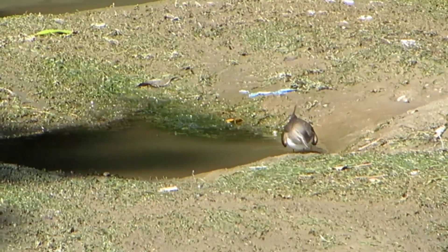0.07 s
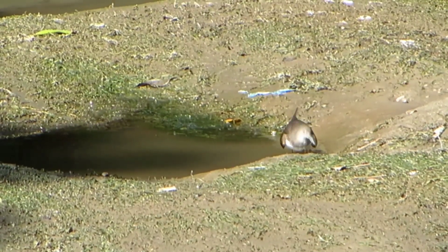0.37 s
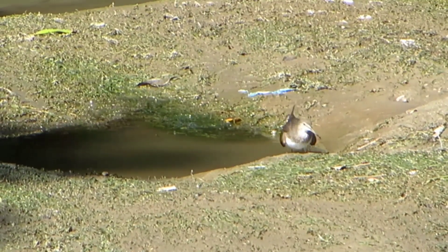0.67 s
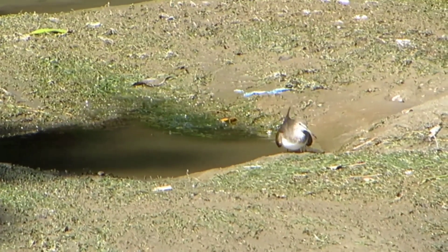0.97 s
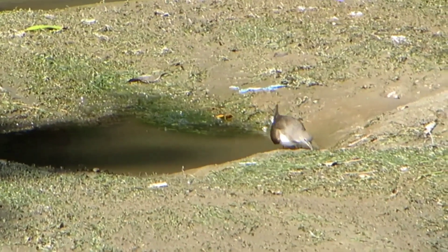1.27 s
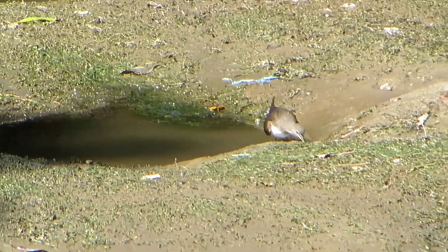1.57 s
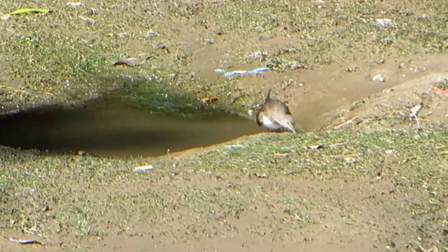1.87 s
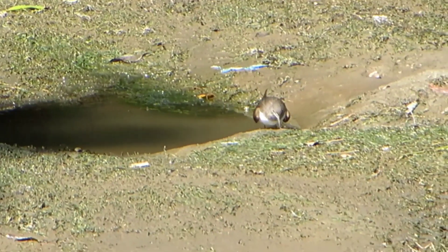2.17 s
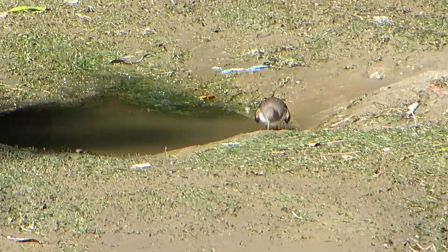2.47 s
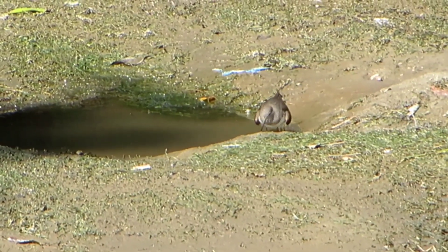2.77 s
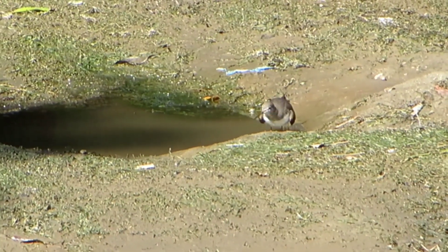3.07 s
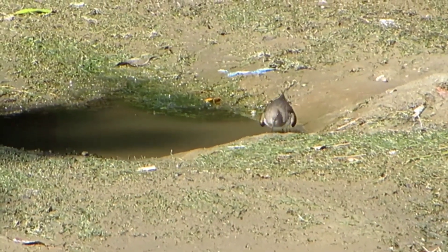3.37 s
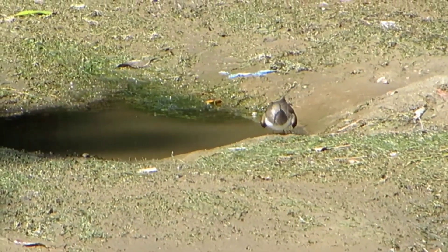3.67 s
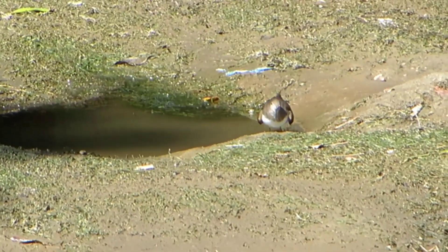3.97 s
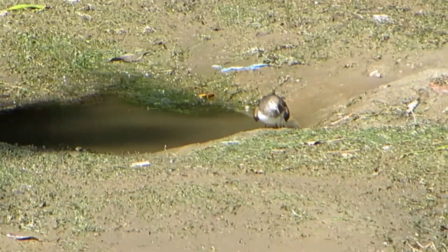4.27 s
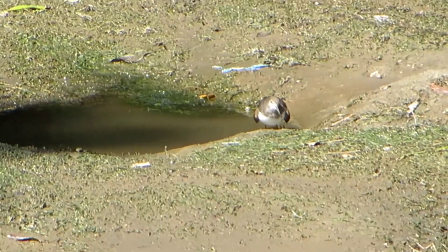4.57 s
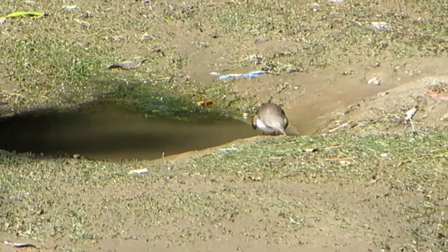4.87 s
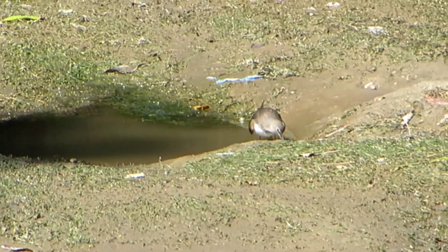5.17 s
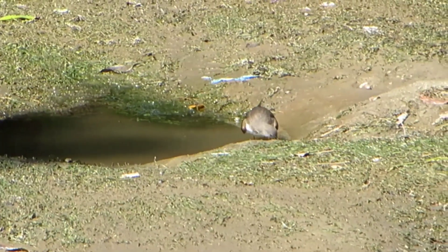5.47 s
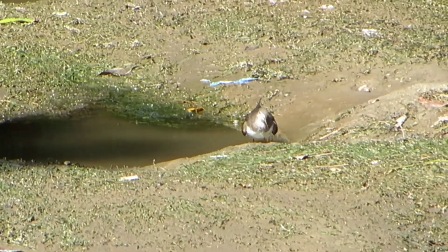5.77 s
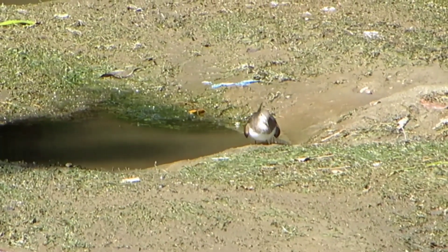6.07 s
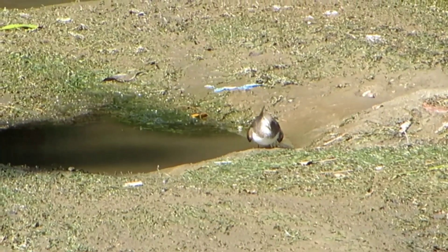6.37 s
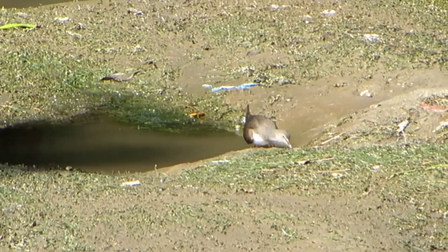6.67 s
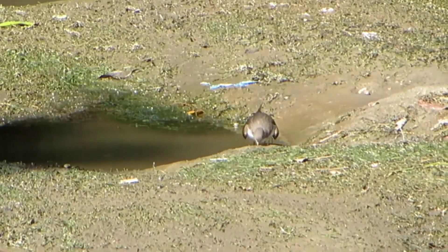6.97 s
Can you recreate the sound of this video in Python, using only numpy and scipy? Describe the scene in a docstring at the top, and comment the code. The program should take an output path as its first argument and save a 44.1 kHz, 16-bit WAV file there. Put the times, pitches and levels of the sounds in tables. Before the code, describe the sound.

Wind blows directly on a microphone outdoors, over a faint steady hiss of air and a very thin, high electronic whine. At the start there are a few light flutters, while a soft background swell fades away. From about 0.8 seconds the gusts strengthen into short, hollow thuds over a rapid flutter of smaller ones, jumping irregularly between left and right. The hardest thud lands at about 1.6 seconds, followed at once by a single distant, raspy bird chirp, barely above the hiss. Strong buffeting continues until about 2.5 seconds, then gives way to lighter, scattered flaps mostly on the right, with a sharper one near 3.4 seconds. From about 4 seconds the wind eases into a low rumble with a few soft, dull thumps, the clearest near 6.1 and 6.9 seconds. The rumble drops away at about 7 seconds.

```python
"""Wind on the two microphone ports of a camera held over a muddy puddle in the open.
From the start, the air hisses behind a fading swell and the camera's electronics whine faintly.
Gusts drive eddies into the ports: short hollow thuds over a flutter of smaller ones.
Just after the hardest thud, at about 1.7 s, comes one far chirp.
From about 4 s the wind eases to a low rumble with a few soft thumps."""
import sys
import numpy as np
from scipy import signal
from scipy.fft import rfft, irfft, next_fast_len
from scipy.io import wavfile
from scipy.ndimage import map_coordinates

SR = 44100
rng = np.random.default_rng(int(sys.argv[2]) if len(sys.argv) > 2 else 0)


def bounce(signal):
    """Save signal as a 16-bit WAV file at the path given by the first command-line argument."""
    frames = np.transpose(np.atleast_2d(signal))
    limited = np.clip(frames, -1, 1)
    pcm = np.round(limited * 32767).astype(np.int16)
    wavfile.write(sys.argv[1], SR, pcm)


N = 314433
TIME = np.arange(N) / SR

# level rides of the far rush and the finer hiss: time_s, level_db
RUSH_RIDE = [(0, -48.5), (.5, -55), (1.2, -52), (1.9, -51.5), (2.6, -52.5), (4.1, -50.5), (4.6, -49.5),
             (6.3, -50), (7.13, -53)]
HISS_RIDE = [(0, -48), (3.0, -47.5), (4.3, -46.5), (5.4, -47), (7.13, -48)]
# tone of the rush, the hiss and the swell: frequency_hz, relative_db
RUSH_TONE = [(20, -19), (60, -5.5), (150, -0.5), (300, 0.5), (400, -3.5), (500, -6.5), (700, 2),
             (1000, 0.5), (1500, -7.5), (3000, -61), (12000, -80)]
HISS_TONE = [(30, -48), (300, -15.5), (700, -1.5), (1200, 0), (1600, 0), (2600, -4), (3300, -7),
             (5000, -10.5), (7000, -13.5), (10000, -19), (15000, -25)]
SWELL_TONE = [(300, -38), (900, -6), (1400, -1.5), (1900, -4.5), (2800, -14), (8000, -50)]
# stereo image of the air: frequency_hz, left_right_correlation
AIR_IMAGE = [(60, 0.83), (300, 1), (800, 0.28), (1500, 0.19), (3000, -0.36), (5000, -0.54), (10000, -0.49),
             (15000, -0.3)]
# electronic whine, the upper two tones beating: pitch_hz, left_db, right_db
WHINE_TONES = [(7866.8, -77, -66.3), (15733.6, -83, -61), (15748.0, -90, -68)]
# gusts that drive the flutter: start_s, length_s, level_db, left_minus_right_db
GUST_CUES = [(0.0, 0.026, -43, 10.5), (0.12, .015, -40, -8), (0.166, 0.037, -37, -3),
             (0.253, 0.043, -48.5, -8), (0.38, 0.063, -53.5, -12), (0.752, 0.075, -38.5, -1),
             (0.894, 0.02, -32, 8.5), (0.952, 0.013, -31.5, 12.5), (1.0, .05, -31.5, 1),
             (1.079, 0.018, -22.5, 11), (1.136, 0.073, -40.5, 10), (1.302, 0.013, -26, -4),
             (1.381, 0.096, -36, 5), (1.502, 0.043, -36, 5), (1.669, 0.064, -27, 1), (1.783, 0.16, -36, -9),
             (1.895, 0.142, -27, 9.5), (2.061, 0.054, -24.5, 2), (2.313, 0.18, -31, 3.5),
             (2.508, 0.11, -49, -12), (2.79, .135, -43, -10.5), (3.257, 0.041, -47, -16.5),
             (3.395, 0.01, -35.5, -21), (3.435, .025, -44, -9), (3.493, 0.076, -46.5, -14),
             (3.677, .02, -42.5, -16), (3.745, .05, -39, -12), (3.813, 0.066, -46, -21.5)]
# base pitch of the small eddies, before gust strength shifts it: time_s, pitch_hz
FLUTTER_PITCH = [(.5, 173), (.95, 280), (2.05, 290), (2.5, 251), (3.9, 310)]
# how the ports and their housing colour the wind: frequency_hz, gain_db
HOUSING_EQ = [(20, -15), (50, -14.5), (100, -6), (200, -1.5), (270, -0.5), (340, 0), (455, -1.5),
              (505, -2.5), (570, 1), (850, 2), (1500, 6)]
# big eddies, before the level cap and the housing: time_s, strength_db, port (0 left, 1 right)
BUFFET_CUES = [(0.129, -27, 1), (0.183, -27, 0), (0.202, -13, 1), (0.789, -21, 1), (0.908, -12.5, 0),
               (0.924, -8, 0), (0.97, -7.5, 0), (1.016, -12, 1), (1.06, -8, 1), (1.083, -11, 0),
               (1.094, -7.5, 0), (1.102, -2.5, 0), (1.145, -17.5, 1), (1.307, -16, 1), (1.316, -7.5, 1),
               (1.321, -5, 0), (1.376, -13, 1), (1.394, -10, 1), (1.411, -12.5, 0), (1.505, -17.5, 0),
               (1.565, 3.5, 1), (1.676, -4.5, 0), (1.695, -5.5, 0), (1.725, -6, 0), (1.826, -16, 1),
               (1.862, -14, 1), (1.908, -14, 0), (1.934, -8.5, 0), (1.958, -8.5, 0), (1.995, -13.5, 0),
               (2.042, -11, 0), (2.063, -8.5, 0), (2.08, -5.5, 1), (2.095, -6.5, 1), (2.102, -7.5, 1),
               (2.132, -16, 1), (2.195, -23, 1), (2.279, -21, 1), (2.315, -13.5, 0), (2.349, -13.5, 1),
               (2.394, -10.5, 0), (2.477, -20, 1), (2.804, -21.5, 1), (2.885, -19.5, 1), (2.927, -14.5, 1),
               (2.948, -19, 1), (2.992, -24, 1), (3.257, -23, 1), (3.396, -6, 1), (3.434, -11.5, 1),
               (3.447, -16.5, 1), (3.513, -15.5, 1), (3.561, -22, 1), (3.609, -23, 1), (3.723, -19, 1),
               (3.756, -16, 1), (3.79, -16.5, 1)]
# level rides of the late breeze: time_s, rumble_db, deep_db
BREEZE_RIDE = [(4.1, -62, -81), (4.3, -52, -69), (4.9, -50.5, -59), (5.3, -47.5, -45.5), (5.6, -51, -50.5),
               (5.9, -49.5, -45.5), (6.08, -46, -46), (6.19, -52, -59), (6.66, -47, -44),
               (6.92, -48.5, -49), (7.02, -69, -66)]
# tone of the breeze's rumble and of its deep layer: frequency_hz, relative_db
RUMBLE_TONE = [(10, -39), (60, -25), (150, 2.5), (240, -1.5), (330, 2), (410, -13), (800, -24), (3000, -90)]
DEEP_TONE = [(15, -11), (30, -4), (60, 9), (100, 4.5), (160, 7), (215, -16), (300, -21), (2000, -90)]
# soft low thumps in the breeze: time_s, peak_db, pitch_hz
THUMP_CUES = [(4.29, -30, 215), (5.023, -26.5, 186), (5.449, -24.5, 150), (5.825, -28.5, 110),
              (6.084, -18.5, 146), (6.61, -21.5, 150), (6.659, -24, 135), (6.675, -24, 210),
              (6.929, -18, 130)]


def from_db(db):
    """Decibels to gain."""
    return 10 ** (np.asarray(db) / 20)


def rms_one(x):
    """Scale to an rms of 1."""
    return x / np.sqrt(np.mean(x ** 2) + 1e-20)


def in_time(rows):
    """Each column of a curve at every sample."""
    time_s, *columns = np.transpose(rows)
    return [np.interp(TIME, time_s, column) for column in columns]


def at_hz(points, hz):
    """Read a curve on a log-frequency axis."""
    point_hz, value = np.transpose(points)
    return np.interp(np.log(hz + 1e-9), np.log(point_hz), value)


def drift(rate_hz):
    """A smooth random wobble, about 1 in size, that changes about rate_hz times a second."""
    knots = rng.standard_normal(N // 40)
    return map_coordinates(knots, [TIME * rate_hz], order=2, mode="wrap")


def filtered(x, gain_at):
    """Weight each frequency by gain_at(hz)."""
    size = next_fast_len(N + SR // 10)
    hz = np.arange(size // 2 + 1) * SR / size
    return irfft(rfft(x, size) * gain_at(hz), size)[:, :N]


def noise_bed(tone, image=((1, 0),)):
    """Stereo noise of rms 1 with a given tone and image; by default the sides are unrelated."""
    size = next_fast_len(N)
    hz = np.arange(size // 2 + 1) * SR / size
    alike = np.clip(at_hz(image, hz), -1, 1)
    mid, side = rfft(rng.standard_normal((2, size)))
    pair = np.sqrt(1 + alike) * mid + np.sqrt(1 - alike) * side * [[1], [-1]]
    return rms_one(irfft(pair * from_db(at_hz(tone, hz)), size)[:, :N])


def open_air(swell_db=-46.5, fade_db_per_s=6):
    """The backdrop: a far rush and a finer hiss, both leaning right, and a swell that dies away early."""
    rush_db, = in_time(RUSH_RIDE)
    hiss_db, = in_time(HISS_RIDE)
    rush = from_db(rush_db + 0.76 * drift(11)) * noise_bed(RUSH_TONE, AIR_IMAGE)
    hiss = from_db(hiss_db + 0.28 * drift(11)) * noise_bed(HISS_TONE, AIR_IMAGE)
    fading_db = swell_db - fade_db_per_s * TIME
    swell = from_db(fading_db + 1.1 * drift(11)) * noise_bed(SWELL_TONE, AIR_IMAGE)
    return rush * from_db([[-.8], [.8]]) + hiss * from_db([[-.2], [.2]]) + swell


def whine():
    """Thin steady tones from the camera's circuits, a quarter cycle apart on the two sides."""
    phase = np.array([[np.pi / 2], [0]])
    return np.sqrt(2) * sum(from_db([[left_db], [right_db]]) * np.sin(2 * np.pi * hz * TIME + phase)
                            for hz, left_db, right_db in WHINE_TONES)


def gust_envelope(attack_db_per_s=899, release_db_per_s=750, lull_db=-67):
    """Each gust rises, holds and falls away; the strongest sets the level at each port, in dB."""
    start_s, length_s, level_db, balance_db = np.transpose(GUST_CUES)[:, :, None]
    attack_db = attack_db_per_s * np.maximum(start_s - TIME, 0)
    release_db = release_db_per_s * np.maximum(TIME - start_s - length_s, 0)
    each_db = level_db - attack_db - release_db
    port_db = [(each_db + side * balance_db).max(axis=0) for side in (.5, -.5)]
    return np.maximum(port_db, lull_db)


def eddies(at_s, peak_db, pitch_hz, port, steepness, skew, size=2048):
    """Each eddy is one suck and push of pressure on one port; small fast ones are higher."""
    ratio = np.arange(size // 2 + 1) * SR / size / pitch_hz[:, None]
    band = (ratio * np.exp(-ratio ** 2 / 2)) ** steepness  # steeper is narrower
    phase = -np.pi / 2 + skew * rng.standard_normal((len(at_s), 1))  # skew makes the swing lopsided
    swings = np.roll(irfft(band * np.exp(1j * phase)), size // 2, axis=1)
    swings *= (from_db(peak_db) * size / 2 / band.sum(axis=1))[:, None]
    starts = np.clip(at_s * SR, 0, N - 1).astype(int)
    track = np.zeros((2, N + size))
    for start, side, swing in zip(starts, port > .5, swings):
        track[int(side), start:start + size] += swing
    return track[:, size // 2:size // 2 + N]


def flutter(count=2200, base_pitch_at_db=-37, db_per_octave=55):
    """Small eddies crowd in at random; a harder gust makes them louder and higher."""
    port_db = gust_envelope()
    base_hz, = in_time(FLUTTER_PITCH)
    at = ((np.arange(count) + rng.random(count)) * (N - 1) / count).astype(int)
    strength, detune, side = rng.standard_normal((3, count))
    octaves = (port_db.mean(axis=0)[at] - base_pitch_at_db) / db_per_octave + 0.39 * detune
    peak_db = 4.9 * np.minimum(strength, 1)
    crowd = eddies(at / SR, peak_db, base_hz[at] * 2 ** octaves, side > 0, steepness=1.62, skew=1.63)
    return rms_one(crowd) * from_db(port_db)


def housing(wind):
    """The microphone sheds the bass and rings a little, so gusts flap hollowly rather than boom."""
    return filtered(wind, lambda hz: from_db(at_hz(HOUSING_EQ, hz)))


def port_bleed(wind, share=0.61, corner_hz=340, lag_s=0.00021):
    """The stereo microphone feeds each port to the other channel, dulled and a little late."""
    dulled = signal.sosfilt(signal.butter(1, corner_hz, fs=SR, output="sos"), wind[::-1])
    return wind + share * np.array([np.interp(TIME - lag_s, TIME, side) for side in dulled])


def buffets(pitch_at_0_db_hz=495, db_per_octave=24.5, cap_db=-1.2):
    """Big eddies thud, higher the harder they hit, each with a weaker one just before or behind it."""
    at_s, strength_db, port = np.transpose(BUFFET_CUES)
    pitch_hz = pitch_at_0_db_hz * 2 ** (strength_db / db_per_octave)
    timing, weight = rng.uniform(-1.07, 1, (len(at_s), 2)).T
    flam_s = at_s + 0.00313 * (np.sign(timing) + .5 * timing)  # 3 to 5 ms either way
    flam_db = np.minimum(strength_db, -8) - 11 + 3 * weight
    thuds = eddies(at_s, np.minimum(strength_db, cap_db), pitch_hz, port, steepness=1.31, skew=0.52)
    return thuds + eddies(flam_s, flam_db, pitch_hz * 0.86, port, steepness=4.1, skew=1.5)


def chirp(peak_s=1.655, half_width_s=0.042, peak_db=-56, pitch_hz=3750, sag_hz_per_s=3500, rasp_hz=330):
    """One far, raspy note that sinks in pitch, barely above the hiss."""
    since_s = TIME - peak_s
    hz = pitch_hz - sag_hz_per_s * np.clip(since_s, -.1, .1) + rasp_hz * drift(900)
    envelope = from_db(peak_db) * np.exp(-(since_s / half_width_s) ** 2)
    return envelope * np.sin(2 * np.pi * np.cumsum(hz) / SR)


def breeze(fade_in_s=0.12, crossing_s=0.0015, carried_gain=0.46, left_gain=0.92):
    """Slow air rumbles on both ports; what rolls over the right also reaches the left a moment later."""
    rumble_db, deep_db = in_time(BREEZE_RIDE)
    fade_in = np.clip((TIME - BREEZE_RIDE[0][0]) / fade_in_s, 0, 1)
    rumble = from_db(rumble_db + 1.7 * drift(35)) * noise_bed(RUMBLE_TONE)
    deep = from_db(deep_db + 1.2 * drift(22)) * noise_bed(DEEP_TONE)
    left, right = fade_in * (rumble + deep)
    right = right + thumps()
    carried = np.interp(TIME - crossing_s, TIME, right)
    return np.array([left_gain * left + carried_gain * carried, right])


def thumps(wake_s=0.0091, wake_db=-5):
    """Large slow eddies on the right port, each trailed by a weaker one."""
    at_s, peak_db, pitch_hz = np.transpose(THUMP_CUES)
    right = np.ones(len(at_s))
    lead = eddies(at_s, peak_db, pitch_hz, right, steepness=1.3, skew=1.0)
    wake = eddies(at_s + wake_s, peak_db + wake_db, pitch_hz, right, steepness=1.7, skew=1.23)
    return (lead + wake)[1]


def scene():
    """The mix: gusts and then breeze up close, with air, chirp and whine behind."""
    gusts = port_bleed(housing(buffets() + flutter()))
    return gusts + breeze() + open_air() + chirp() + whine()


def record(dry):
    """A steep high cut takes off the very top."""
    cutoff_hz, edge_hz = 15980, 200
    return filtered(dry, lambda hz: np.clip((cutoff_hz - hz) / edge_hz + .5, 0, 1))


dry = scene()
out = record(dry)
bounce(out)
```